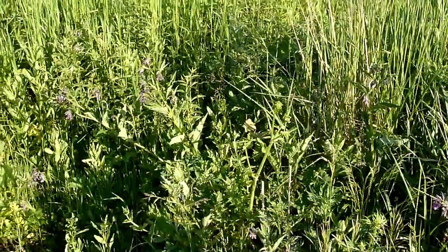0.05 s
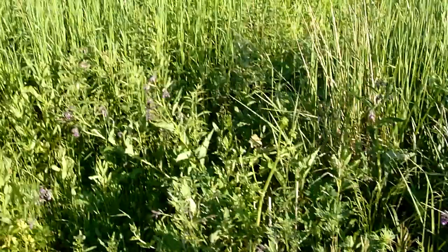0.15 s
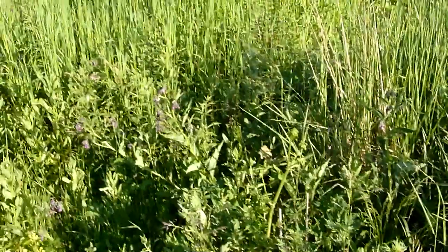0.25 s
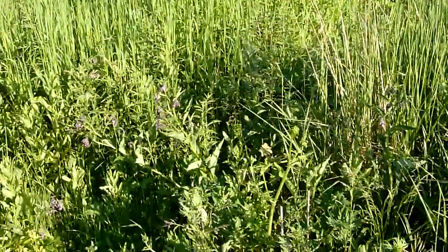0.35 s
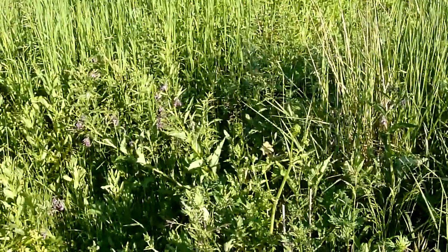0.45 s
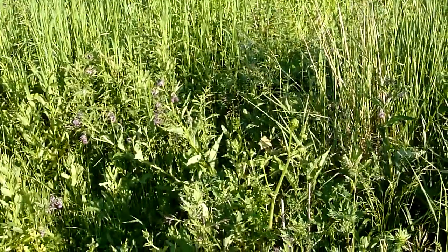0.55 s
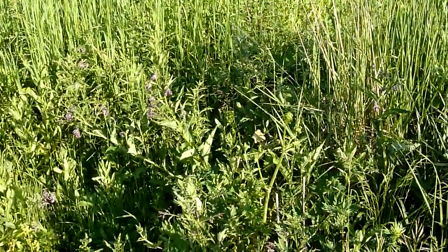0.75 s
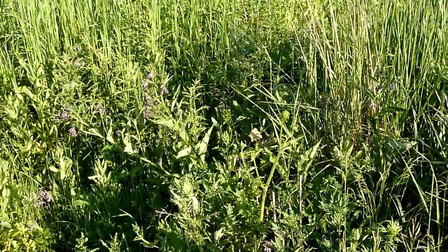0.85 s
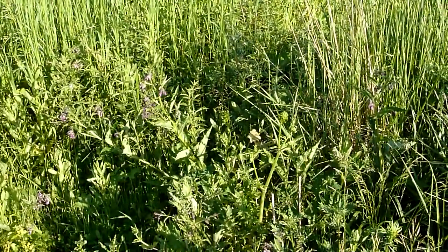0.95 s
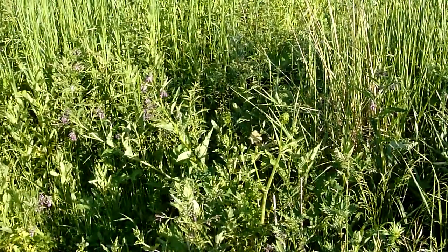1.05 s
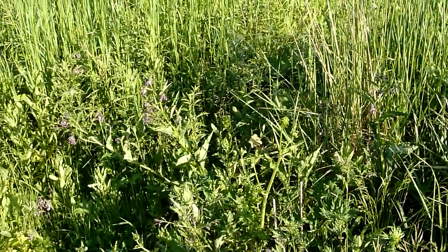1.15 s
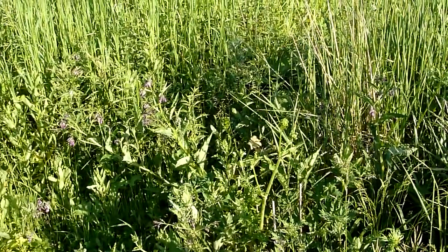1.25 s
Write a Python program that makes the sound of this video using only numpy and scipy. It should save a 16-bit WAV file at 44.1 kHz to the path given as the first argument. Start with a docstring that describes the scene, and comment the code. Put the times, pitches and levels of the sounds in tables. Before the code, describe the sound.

A corncrake gives two short, dry, harsh rasps over quiet outdoor background noise.

```python
"""A dry double rasp, "crex crex": a corncrake calling from tall grass.
Each rasp is a limping train of about 120 snaps a second, fired by the syrinx, ringing in the throat
and beak, then scattering off the near stems and the far meadow.
A few faint rustles sit behind it, over a bed of soft hiss, faint hum and low, far rumble."""
import sys
import numpy as np
from scipy import signal
from scipy.fft import rfft, irfft
from scipy.io import wavfile

SR = 44100
rng = np.random.default_rng(int(sys.argv[2]) if len(sys.argv) > 2 else 0)


def generate_wav(sig):
    """Save sig (samples, or channels by samples) to the path in sys.argv[1] as 16-bit PCM at SR."""
    pcm = np.round(np.clip(np.atleast_2d(sig).T, -1, 1) * 32767).astype(np.int16)
    wavfile.write(sys.argv[1], SR, pcm)


N = 57330

# Rhythm of each rasp: start t/s, end t/s, snap period/s, limp depth/s, limp rate/cycles per snap,
# limp start phase/cycles, final drag/s
RASP_RHYTHM = [(.2328, .437, .0083, .00087, .386, .123, .001),
               (.9490, 1.124, .0085, .00079, .3965, .029, .004)]
# Effort envelope, one per rasp: t/s, relative body level/dB, relative treble level/dB, main resonance f/Hz
RASP_EFFORT = [
    [(0.235, -30.5, -36, 1680), (0.243, -26.5, -28, 1680), (0.275, -27.5, -25, 1672),
     (0.345, -26, -23, 1672), (0.415, -36, -46.5, 1520), (0.445, -44, -62, 1730)],
    [(0.951, -36.5, -38, 1740), (0.959, -26, -27, 1590), (0.969, -29.5, -28.5, 1620),
     (1.055, -28.5, -25, 1650), (1.093, -29.5, -31.5, 1537), (1.117, -35.5, -47, 1610),
     (1.125, -55, -47, 1670)],
]


def corncrake(size=2048):
    """Every snap rings the throat; effort rides its strength, brightness and main resonance."""
    out = np.zeros(N + size)
    for which, (rhythm, effort) in enumerate(zip(RASP_RHYTHM, RASP_EFFORT)):
        times, period = snap_times(*rhythm), rhythm[2]
        gaps = np.diff(times, prepend=times[0] - period)
        effort_times, *envelopes = np.transpose(effort)
        for when, gap in zip(times, gaps):
            body_db, treble_db, main_hz = (np.interp(when, effort_times, curve) for curve in envelopes)
            colour_db = throat(bins(size), which, body_db, treble_db, main_hz)
            cycle, lag = syrinx(period - gap, size)
            first = int((when - lag) * SR)
            out[first:first + size] -= irfft(cycle * ringing(colour_db))
    return out[:N]


def snap_times(start, end, period, limp, limp_rate, limp_phase, drag):
    """An even beat, swung so the snaps fall in twos and threes, dragging as the rasp runs out."""
    first_late_s, drag_span_s, jitter_s = 0.001194, 0.01, 0.00009
    k = np.arange(int((end - start) / period) + 1)
    swing = limp * np.sin(2 * np.pi * (limp_rate * k + limp_phase))
    slow_start = first_late_s * (k == 0)  # the syrinx takes a moment to get going
    slow_end = drag * np.exp((k - k[-1]) * period / drag_span_s)
    return start + k * period + swing + slow_start + slow_end + jitter_s * rng.standard_normal(len(k))


OPENING_LEAD_S, OPENING_SPREAD_S, OPENING_DB, OPENING_HZ = 0.00115, 0.00007, -4, 5200
HURRY_DB_PER_S = 1800  # the opening click hits harder after a short gap
SNAP_TOP_HZ, SMEAR_S = 8630, 0.00037  # the snap rolls off here, and this pitch trails the bass by SMEAR_S
AIR_DB, AIR_DECAY_S, AIR_ABOVE_HZ = -1, 0.0063, 7400


def syrinx(hurry_s, size):
    """A dull opening click, then the snap and a bright puff of turbulence: (spectrum, snap lag/s)."""
    hz, t = bins(size), np.arange(size) / SR
    lag = abs(OPENING_LEAD_S + OPENING_SPREAD_S * rng.standard_normal())
    snap = np.exp(-2j * np.pi * hz * lag)
    opening = from_db(OPENING_DB + HURRY_DB_PER_S * hurry_s) / (1 + 1j * hz / OPENING_HZ)
    rolloff = signal.freqs(*signal.butter(N=4, Wn=1, analog=True), hz / SNAP_TOP_HZ)[1]
    smear = np.exp(-1j * np.pi * SMEAR_S * hz ** 2 / SNAP_TOP_HZ)
    puff = unit_rms(rng.standard_normal(size) * np.exp(-t / AIR_DECAY_S))
    highpass = hz ** 2 / (hz ** 2 + AIR_ABOVE_HZ ** 2)
    air = from_db(AIR_DB) * rfft(puff) / np.sqrt(size) * highpass
    return (opening + snap) * rolloff * smear + snap * air, lag


# EQ of the bare snap: f/Hz, level/dB
SNAP_EQ = [(100, -4.1), (1200, -3.5), (3000, 9.1), (5000, -2.97), (7200, -1), (9000, -4.5), (12000, -8),
           (15500, -23)]
# Throat and beak resonances: f/Hz, width/Hz, boost in first rasp/dB, boost in second rasp/dB
THROAT_PEAKS = [(265, 160, 14, 14.5), (704, 38, 4.5, 5), (895, 170, 15.5, 18), (1460, 66, 0.5, 5),
                (1970, 64, 2.5, 10.5), (2318, 100, 10, 8.5), (2731, 132, 15.5, 19), (3366, 178, 6.9, 8.5),
                (3793, 100, 11, 10), (4150, 124, 10, 12), (4550, 185, 19, 17), (5314, 117, 22.2, 23.5),
                (5657, 58, 14.5, 12.5), (5916, 300, 10.5, 11.5), (6634, 560, 16, 16), (7995, 230, 14, 15),
                (10060, 400, 6, 7.5), (11420, 63, 12, 11), (13400, 500, 5, 8.5)]
MAIN_WIDTH_HZ, MAIN_BOOST_DB = 186, 22
BODY_GAIN_DB, BODY_BELOW_HZ, TREBLE_GAIN_DB, TREBLE_ABOVE_HZ = 17.5, 3100, 17, 5200
FULL_EFFORT_DB, LOW_FADE, LOW_BELOW_HZ = -24, 0.63, 1250  # lows lose LOW_FADE dB extra per dB of slack
LEVEL_SPREAD_DB, SIZE_SPREAD = 0.35, 0.005  # snap-to-snap variation in strength and throat size


def throat(hz, which, body_db, treble_db, main_hz):
    """One snap's tone in dB: throat and beak peaks on the bare snap, thinner as effort drops."""
    shelves = [(BODY_BELOW_HZ, body_db + BODY_GAIN_DB), (TREBLE_ABOVE_HZ, treble_db + TREBLE_GAIN_DB)]
    thinning = LOW_FADE * min(body_db - FULL_EFFORT_DB, 0) / (1 + (hz / LOW_BELOW_HZ) ** 8)
    stretched = hz * (1 + SIZE_SPREAD * rng.standard_normal())
    peaks = MAIN_BOOST_DB * bell(stretched, main_hz, MAIN_WIDTH_HZ)
    peaks += sum(boosts[which] * bell(stretched, centre, width) for centre, width, *boosts in THROAT_PEAKS)
    accent = LEVEL_SPREAD_DB * rng.standard_normal()
    return at_hz(SNAP_EQ, hz) + at_hz(shelves, hz) + thinning + peaks + accent


def ringing(db):
    """The minimum-phase filter with this EQ: it rings only after it is struck."""
    cepstrum = irfft(db * np.log(10) / 20)
    half = len(cepstrum) // 2
    cepstrum[1:half] *= 2
    cepstrum[half + 1:] = 0
    return np.exp(rfft(cepstrum))


def stems(bird, send_db=-4.5, above_hz=2160):
    """Near stems throw back a tight, narrow tail, strongest in the treble."""
    hz = bins(N)
    return scatter(bird, from_db(send_db) * hz / np.hypot(hz, above_hz), t60_s=0.055, side_db=-15)


# EQ of the far scatter: f/Hz, relative level/dB
MEADOW_EQ = [(200, -24), (1600, -14.5), (2800, -3.5), (4300, 2.5), (5300, 3.5), (6000, 7), (7500, -1.5),
             (15000, 13)]


def meadow(bird, send_db=-14.5):
    """Far grass returns a longer, wider, bright tail."""
    return scatter(bird, from_db(send_db + at_hz(MEADOW_EQ, bins(N))), t60_s=0.35, side_db=-2.5)


def scatter(x, gain, t60_s, side_db):
    """Countless small reflections dying away; side_db sets their stereo width."""
    mid, side = rng.standard_normal((2, N)) * from_db(-60 * np.arange(N) / SR / t60_s)
    reflections = unit_rms(mid + from_db(side_db) * side * [[1], [-1]])
    tail = irfft(rfft(reflections) * gain, N) / np.sqrt(N)
    return signal.fftconvolve(x[None], tail[:, :N // 2], axes=1)[:, :N]


# Rustle cues: peak t/s, swell width/s, level/dB, centre f/Hz, band width/octaves
RUSTLE_CUES = [(0.04, 0.039, -50.5, 5240, 0.63), (0.101, 0.0022, -38, 5330, 0.27),
               (0.111, 0.0022, -44, 5700, 0.12), (0.119, 0.0032, -40, 5900, 0.14),
               (0.112, 0.023, -46, 5660, 0.76), (0.19, 0.022, -51.5, 5200, 0.74),
               (0.633, 0.02, -52, 3570, 0.42)]


def rustles():
    """Brief swells of high noise among the stems."""
    t = np.arange(N) / SR
    return sum(from_db(db) * bell(t, when, swell) * noise_band(hz, octaves)
               for when, swell, db, hz, octaves in RUSTLE_CUES)


# EQ of the outdoor bed: f/Hz, relative level/dB
BED_EQ = [(25, -21), (55, -8.5), (110, -8), (170, -3), (229, -10.5), (354, -11), (502, -10), (754, -13),
          (1050, -14.5), (1330, -18), (2100, -20), (3160, -23), (6040, -26.5), (8590, -32.5),
          (16000, -38.5)]


def outdoor_bed(start_db=-44.5, fade_db_per_s=-1.5, hum_db=-54):
    """Distant outdoor noise and soft hiss, slowly easing, with a faint wavering hum."""
    level = from_db(start_db + fade_db_per_s * np.arange(N) / SR)
    hum = noise_band(centre_hz=143, octaves=0.033)
    wash = stereo_noise(from_db(at_hz(BED_EQ, bins(N))))
    return level * wash + from_db(hum_db) * hum


# Fader moves of the rumble: t/s, level before trim/dB
RUMBLE_FADER = [(0.0, -44.5), (0.514, -52), (0.582, -53), (0.6, -52.5), (1.108, -51.5), (1.132, -59),
                (1.22, -44.5), (1.266, -62), (1.3, -65)]


def rumble(trim_db=0.5):
    """Deep outdoor rumble that comes and goes."""
    fader_db = np.interp(np.arange(N) / SR, *np.transpose(RUMBLE_FADER))
    return from_db(fader_db + trim_db) * noise_band(centre_hz=74.5, octaves=0.48)


# Stereo image of the background: f/Hz, left-right correlation/0..1
STEREO_IMAGE = [(30, 0.94), (140, 1), (300, 0.7), (700, 0.3), (1500, 0.2), (4000, 0.18), (12000, 0.14)]


def stereo_noise(gain):
    """Coloured noise at unit rms, near mono in the bass and wide in the treble."""
    mid, side = rfft(rng.standard_normal((2, N)))
    alike = at_hz(STEREO_IMAGE, bins(N))
    spectrum = np.sqrt(1 + alike) * mid + np.sqrt(1 - alike) * side * [[1], [-1]]
    return unit_rms(irfft(gain * spectrum, N))


def noise_band(centre_hz, octaves):
    """A bell-shaped band of stereo noise."""
    return stereo_noise(bell(np.log2(bins(N)), np.log2(centre_hz), octaves))


def from_db(db):
    """Decibels to gain."""
    return 10 ** (np.asarray(db) / 20)


def unit_rms(x):
    """Scale to an rms of 1."""
    return x / np.sqrt(np.mean(x ** 2) + 1e-20)


def bins(size):
    """Frequencies of a spectrum, in Hz."""
    return np.maximum(np.fft.rfftfreq(size, 1 / SR), 1)


def at_hz(points, hz):
    """Read a table along log frequency."""
    f, value = np.transpose(points)
    return np.interp(np.log(hz), np.log(f), value)


def bell(x, centre, width):
    """A bell curve of height 1; width is its standard deviation."""
    return np.exp(-.5 * ((x - centre) / width) ** 2)


def scene():
    """The bird dead centre, its scatter in the grass, and the field around it."""
    bird = corncrake()
    return bird + stems(bird) + meadow(bird) + rustles() + outdoor_bed() + rumble()


def record(dry):
    """A steep high cut on the whole mix."""
    cutoff_hz = 15950
    return signal.sosfilt(signal.ellip(12, .1, 80, cutoff_hz, fs=SR, output="sos"), dry)


dry = scene()
out = record(dry)
generate_wav(out)
```